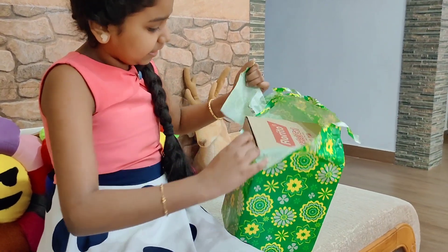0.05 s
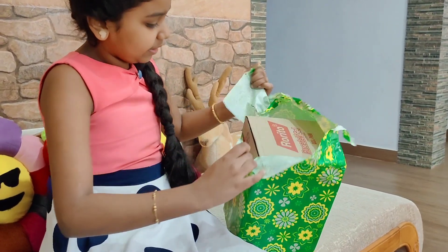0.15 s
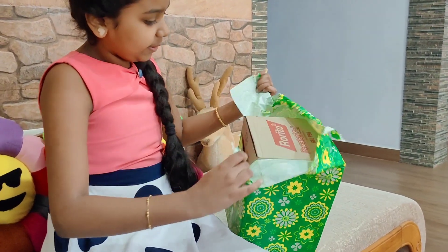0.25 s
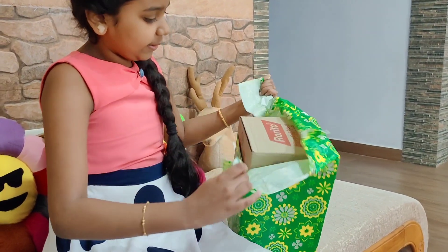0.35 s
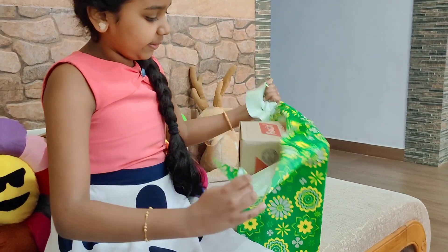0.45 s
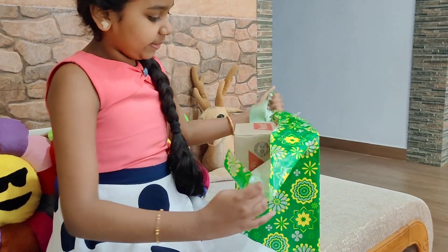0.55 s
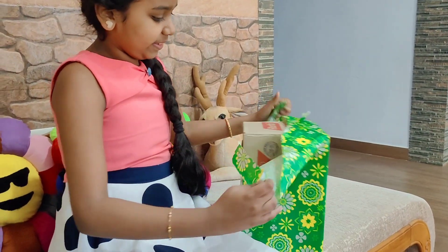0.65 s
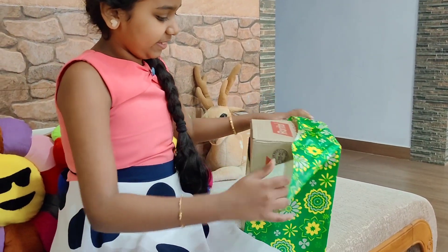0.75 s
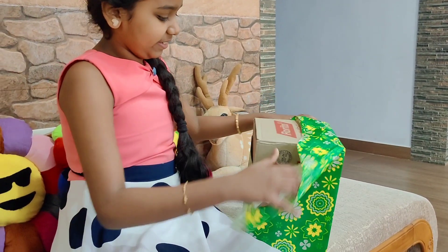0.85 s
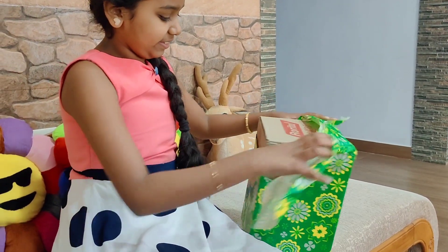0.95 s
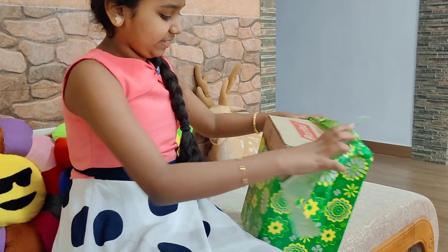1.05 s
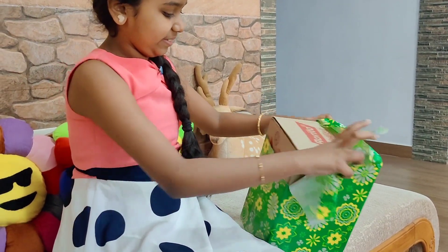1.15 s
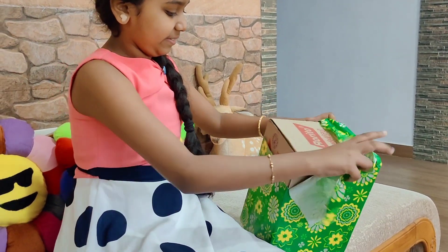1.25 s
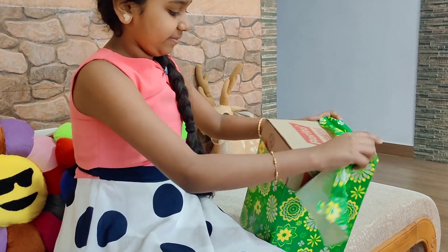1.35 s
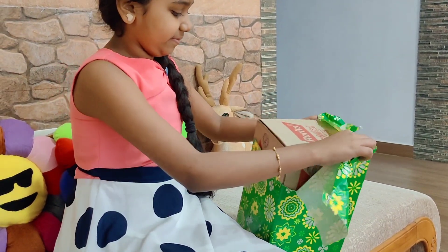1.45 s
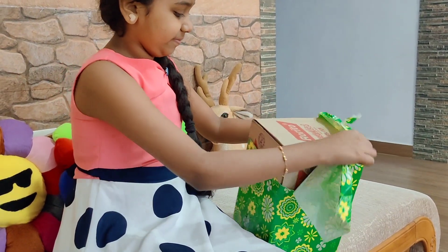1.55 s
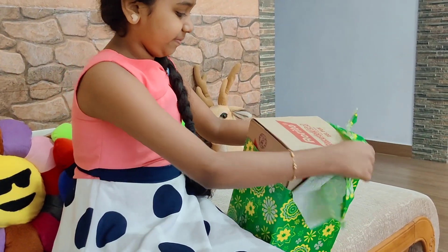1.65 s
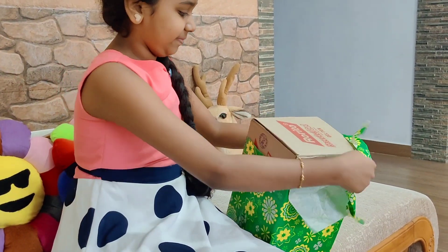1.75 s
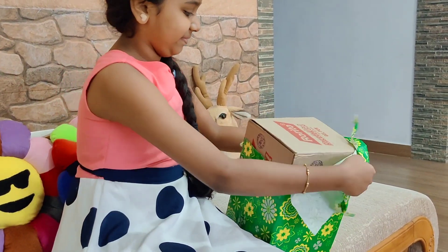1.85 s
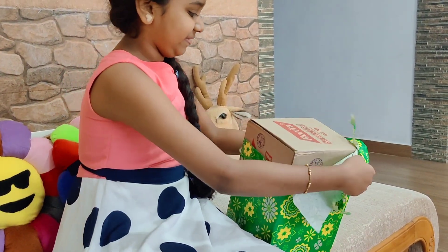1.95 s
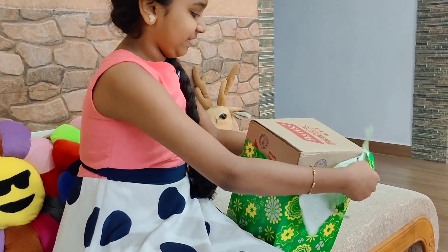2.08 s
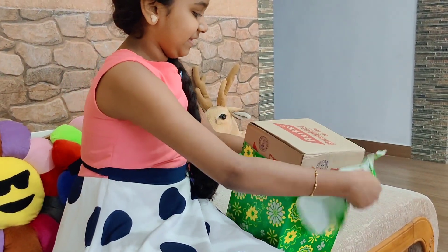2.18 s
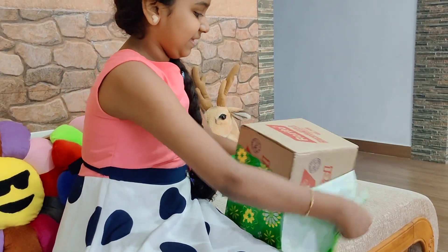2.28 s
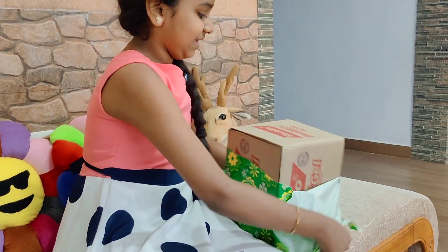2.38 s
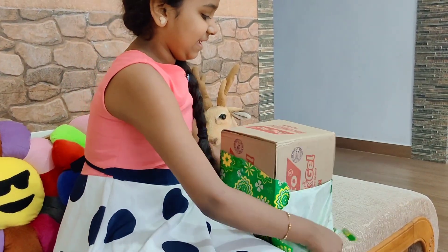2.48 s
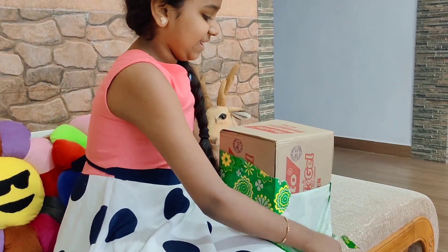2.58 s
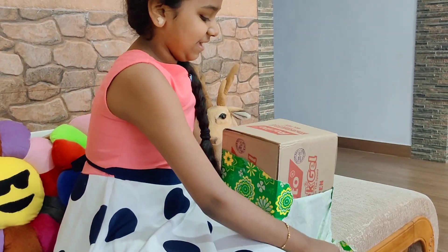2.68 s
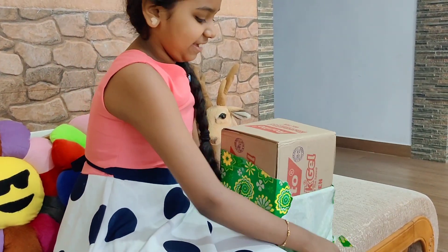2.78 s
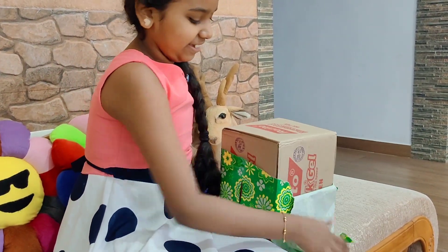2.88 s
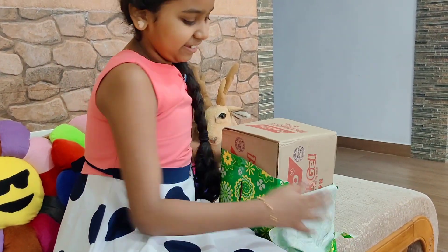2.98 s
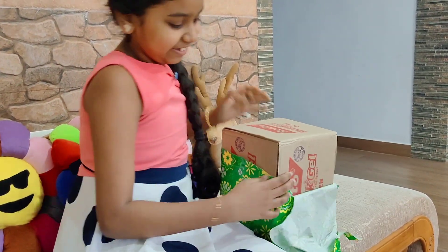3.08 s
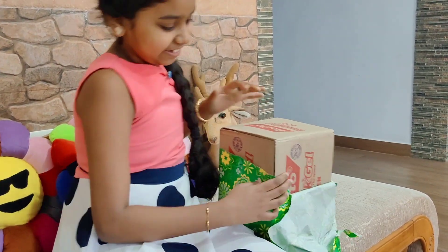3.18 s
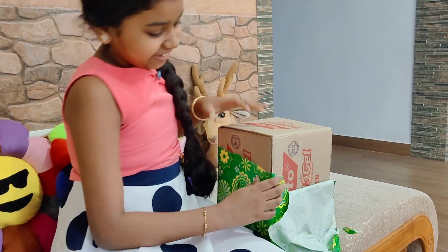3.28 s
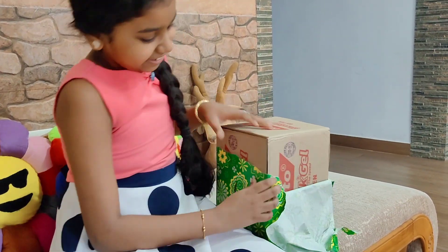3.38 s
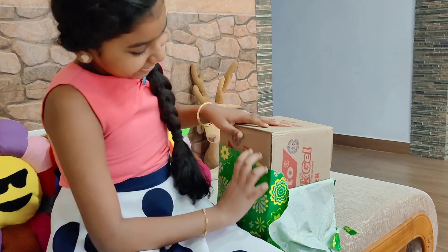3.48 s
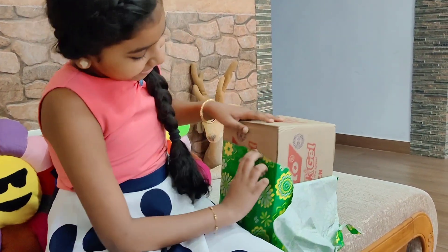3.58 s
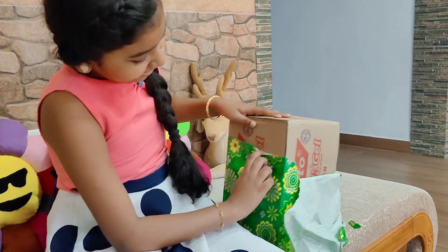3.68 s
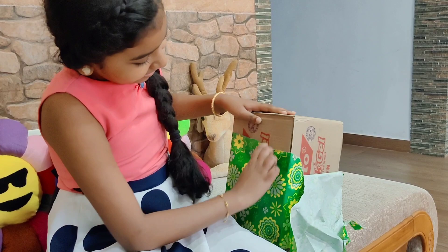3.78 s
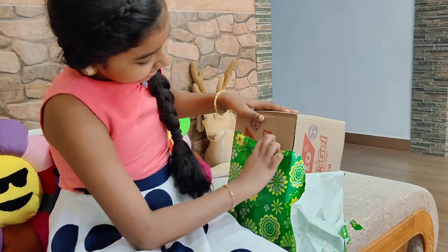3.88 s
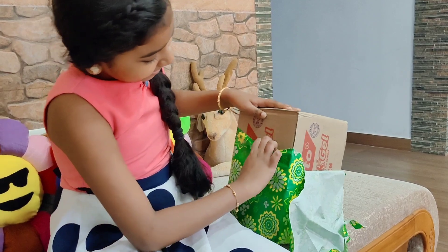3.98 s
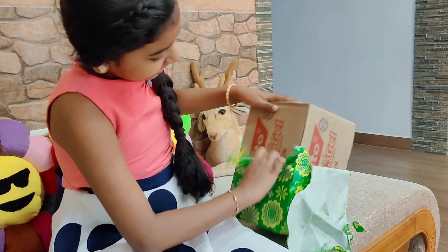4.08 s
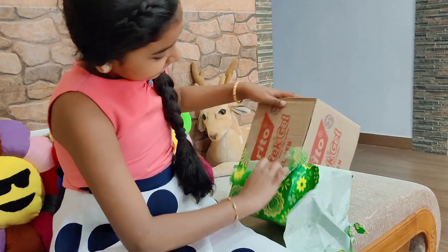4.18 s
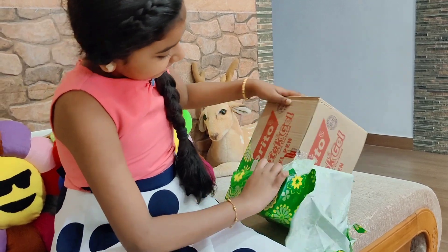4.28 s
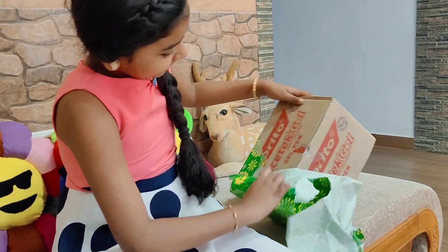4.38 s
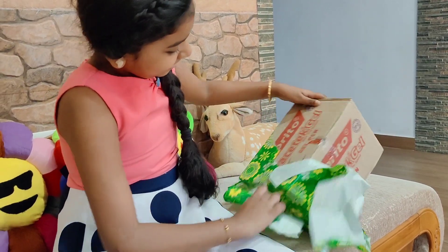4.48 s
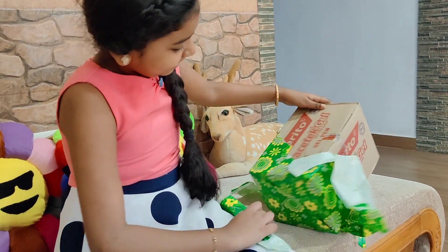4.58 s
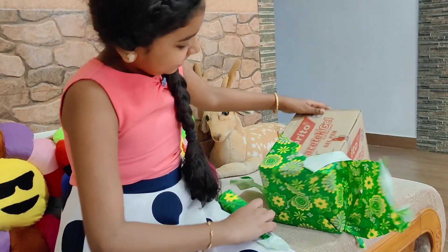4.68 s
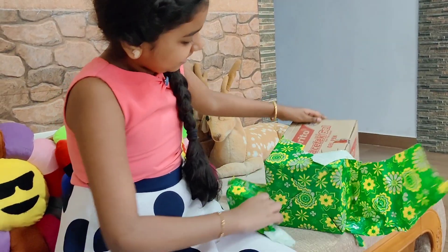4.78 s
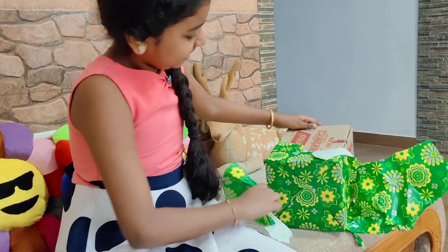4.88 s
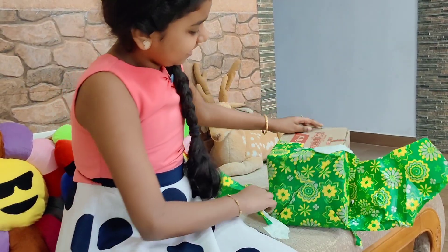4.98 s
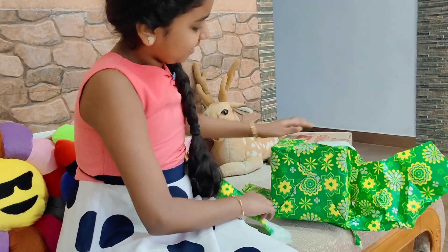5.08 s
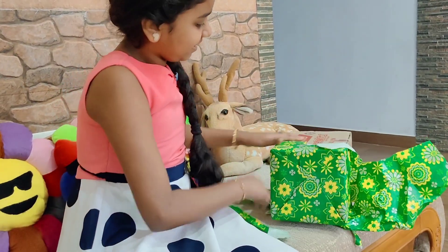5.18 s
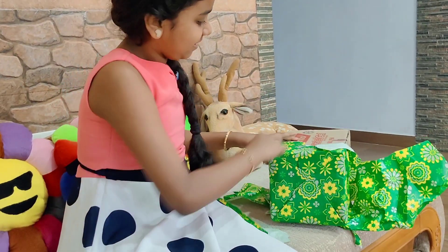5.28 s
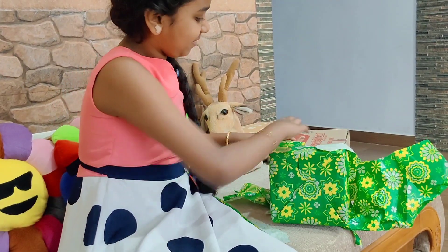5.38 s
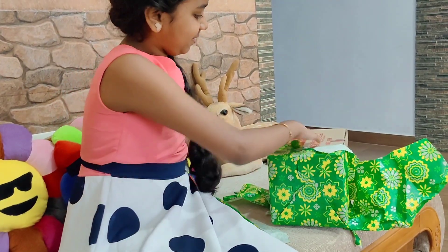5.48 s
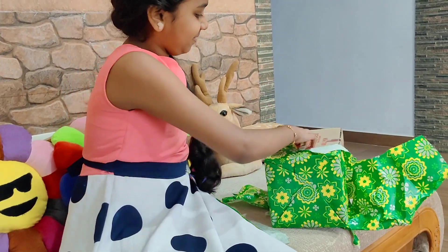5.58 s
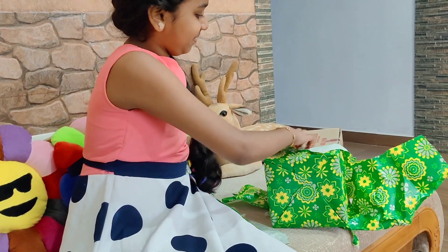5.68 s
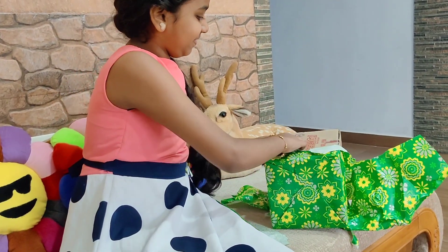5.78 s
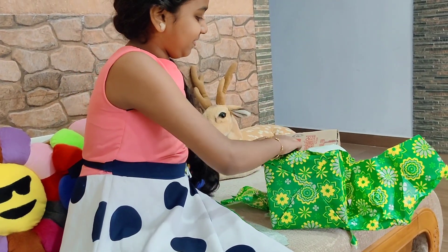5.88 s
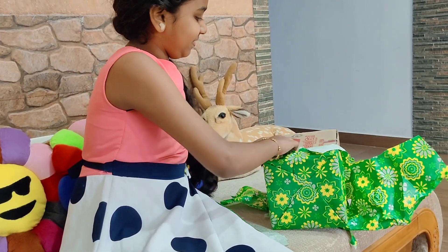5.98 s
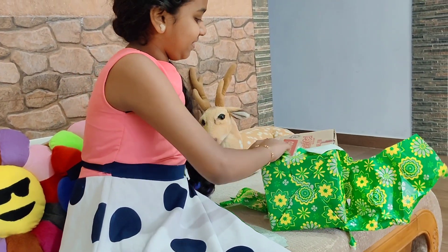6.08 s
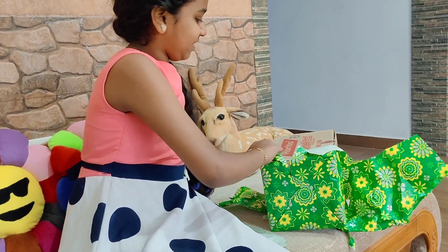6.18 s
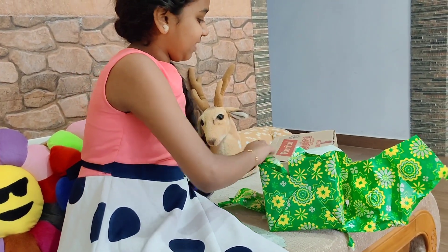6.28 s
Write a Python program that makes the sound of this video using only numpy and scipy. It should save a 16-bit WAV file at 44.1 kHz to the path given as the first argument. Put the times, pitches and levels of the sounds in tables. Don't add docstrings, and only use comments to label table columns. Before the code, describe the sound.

Thin glossy wrapping paper comes off a cardboard box in a hard, tiled room, heard by a bright phone about two metres away, over faint hiss and a distant low drone. Dense rustling starts at once; at about 0.28 s tape lets go in a very sharp, overloaded volley of cracks. Crinkling with crisp snaps goes on until 0.65, eases, then resumes near 0.97 with scattered clicks and pops through 2.0. From 2.1 paper is dragged down, strongest around 2.4 to 2.6, with soft hollow box thuds. From 3.0 to 3.65 it is nearly quiet: a metal bangle tinkles very faintly amid tiny ticks. Gripping crackles return at 3.7, swelling into a hard tug at 4.15 to 4.35 and another burst at 4.45 to 4.65. It fades to a lull around 5.1 to 5.6, then light picking, ticks and muffled taps grow until the end at about 6.3.

```python
import sys
import numpy as np
from scipy import signal
from scipy.fft import rfft, irfft
from scipy.io import wavfile
from scipy.ndimage import uniform_filter1d

SR = 44100
rng = np.random.default_rng(int(sys.argv[2]) if len(sys.argv) > 2 else 0)


def volts(x):
    e = np.asarray(x, float) / 20
    return 10 ** e


def pcm_store(signal):
    levels = np.round(np.clip(np.atleast_2d(signal), -1, 1) * 32767)
    wavfile.write(sys.argv[1], SR, levels.astype(np.int16).T)


N = 279594

# frequency in Hz, density in dB per Hz.
PAPER = [(65, -58), (110, -17), (221, -18.5), (279, -13.5), (399, -13), (707, -20), (1030, -15.5),
         (1520, -17.5), (2520, -18.5), (4870, -9.5), (6370, -2), (7490, 0), (7900, -18), (10300, -11),
         (17400, -120)]
# start in seconds, peak in dB, broad part in dB, left minus right in dB.
SNAPS = [(0.4285, -15.5, -28, -5), (0.5190, -19, -21, -16), (0.762, -28.5, -29, -10),
         (0.9734, -16.5, -24, -3), (1.0336, -19, -19, -5), (1.099, -15, -22, 0), (1.2452, -22.5, -4.5, -8),
         (1.4498, -23.5, -8, -9), (1.512, -12.5, -37, -2), (1.721, -21.5, -31, -6), (2.0425, -20, -9.5, -9),
         (2.394, -16.5, -6.5, -12.5), (2.4659, -13.5, -4.5, 1.5), (2.4946, -9.5, -16.5, -15),
         (2.628, -19.5, -10, 0), (2.723, -25.5, -32, 11), (3.7155, -27.5, -6.5, -1),
         (3.8076, -22.5, -34, -1.5), (3.9057, -20.5, -40, 4), (3.981, -22.5, -14.5, -12.5),
         (4.0704, -19.5, -31, -5), (4.0912, -17.5, -33.5, -7), (4.1204, -17.5, -30, -11),
         (4.1521, -11.5, -12.5, -9), (4.1695, -7, -10, 0.5), (4.208, -13.5, -35.5, -8.5),
         (4.4169, -17.5, -20, -1.5), (4.4477, -12, -29, -6), (4.5437, -11.5, -18, 9),
         (5.6999, -22, -19, -5)]
# start in seconds, peak in dB, broad part in dB,
# left minus right in dB.
MORE_SNAPS = [(0.4864, -19.5, -22, 3), (0.733, -31.5, -37, -10), (0.786, -34, -14, 12), (0.883, -35, -4.5, -2),
              (1.338, -28.5, -27, -6), (1.493, -28, -21, -7), (1.598, -23.5, -23, -7.5),
              (1.845, -32.5, -21, -16.5), (2.156, -30.5, -33.5, -32.5), (2.335, -24.5, -38, -4),
              (2.9502, -27.5, -7, -3), (3.181, -44, -19, 3), (3.2273, -38, -2.5, -5), (3.4262, -37, -18, 3),
              (3.517, -39.5, -22, -9), (3.5442, -38, -19, -7), (3.76, -23, -14, -8.5), (4.362, -20.5, -21, -2.5),
              (4.8096, -38, -26, 12), (4.869, -38, -9, -17), (5.075, -41, -19, 6), (5.6273, -39.5, -10, 0),
              (5.787, -27, -10, -5), (5.906, -27.5, -12, -3), (5.97, -21, -11.5, -7), (6.0214, -25, -14, 4),
              (6.1124, -22, -11, -7), (6.164, -20, -8, -4), (6.2316, -23.5, -31, -9), (6.318, -20.5, -30, -4.5)]
# start in seconds, peak in dB, pitch in Hz, T60 in seconds.
KNOCKS = [(0.274, -37.5, 395, 0.033), (0.518, -48.5, 267, 0.23), (0.738, -54.5, 428, 0.072),
          (0.858, -55.5, 295, 0.036), (0.971, -65, 293, 0.064), (1.18, -48, 406, 0.044),
          (2.138, -55, 318, 0.073), (2.299, -40.5, 544, 0.018), (2.393, -47.5, 403.5, 0.14),
          (2.761, -46, 345.3, 0.09), (2.966, -58, 276, 0.25), (3.213, -63.5, 185.8, 0.22),
          (3.289, -63, 357, 0.073), (3.46, -51.5, 190, 0.15), (3.62, -58.5, 366, 0.078),
          (3.658, -51.5, 361, 0.045), (3.729, -44.5, 355, 0.087), (3.759, -45, 294.6, 0.088),
          (3.778, -45.5, 383, 0.09), (3.799, -64, 363, 0.031), (3.902, -53, 270, 0.044),
          (3.948, -48.5, 342.4, 0.12), (3.982, -50, 393, 0.14), (4.119, -48, 382, 0.21),
          (4.166, -41.5, 347, 0.066), (4.218, -52, 413, 0.16), (5.628, -48.5, 342, 0.078),
          (5.785, -50.5, 285.3, 0.19), (6.027, -51, 360, 0.073), (6.198, -47.5, 181, 0.13)]
LEFT_LAG = 50


def level(x, db):
    return x * volts(db) / np.sqrt(np.mean(x ** 2))


def colour(x, points):
    hz, db = np.transpose(points)
    grid = np.maximum(np.fft.rfftfreq(4096, 1 / SR), 1)
    gain_db = np.interp(np.log(grid), np.log(hz), np.maximum(db, -60))
    ceps = irfft(np.log(volts(gain_db)))
    ceps[1:2048] *= 2
    ceps[2049:] = 0
    taps = irfft(np.exp(rfft(ceps)))
    return signal.oaconvolve(np.atleast_2d(x), taps[None], axes=1)[:, :N]


def band(x, index):
    edges_hz = [110, 650, 2000, 4500, 8100]
    sos = signal.butter(2, edges_hz[index:index + 2], "bandpass", fs=SR, output="sos")
    return signal.sosfilt(sos, x)


def impulses(s, size):
    return np.bincount(np.clip((s * SR).astype(int), 0, N - 1), size, N)


def dying(s, db, time_s):
    return signal.lfilter([1], [1, -np.exp(-2 / (time_s * SR))], impulses(s, volts(db) ** 2))


def sides(pan_db):
    return volts(np.array([pan_db, -pan_db]) / 2)


def buckle(spikes, flutter_s, flutter_db, lag):
    shared = 0.35
    left, right = np.atleast_2d(spikes)[0], np.atleast_2d(spikes)[-1]
    direct = np.array([np.roll(left, lag), right])
    power = signal.lfilter([1], [1, -np.exp(-2 / (flutter_s * SR))], direct ** 2)
    both, *own = rng.standard_normal((3, N))
    shake = np.sqrt(shared) * np.array([np.roll(both, lag), both]) + np.sqrt(1 - shared) * np.array(own)
    return colour(direct + volts(flutter_db) * np.sqrt(power) * shake, PAPER)


def air():
    # frequency in Hz, density in dB per Hz.
    hiss_curve = [(40, -22), (65, -13), (100, -7.5), (250, -13.5), (700, -23.5), (1700, -25.5),
                  (3000, -20.5), (5000, -16.5), (6700, -9), (7500, -8), (8000, -30.5)]
    patch_db, patch_s = 1.6, 0.05
    mid, side = colour(rng.standard_normal((2, N)), hiss_curve)
    side = signal.sosfilt(signal.butter(1, 500, "highpass", fs=SR, output="sos"), side)
    even = np.array([mid + side, mid - side])
    size = int(patch_s * SR)
    drift = uniform_filter1d(uniform_filter1d(rng.standard_normal((4, N)), size=size), size=size)
    patches = sum(band(even, index) * (volts(level(d, 0) * patch_db) - 1) for index, d in enumerate(drift))
    return level(even + patches, -62)


def hum():
    # time in seconds, level in dB.
    drone_curve = [(0.0, -62.5), (1.16, -70.5), (1.59, -64.5), (1.87, -73), (2.21, -58.5), (2.4, -64.5),
                   (3.85, -65.5), (4.22, -63.5), (5.08, -64.5), (5.95, -65.5), (6.34, -63.5)]
    pitch_hz, width_hz = 45, 16
    t = np.arange(N) / SR
    edges = [pitch_hz - width_hz / 2, pitch_hz + width_hz / 2]
    sos = signal.butter(1, edges, "bandpass", fs=SR, output="sos")
    rumble = signal.sosfilt(sos, rng.standard_normal(N))
    drone = level(rumble, 2.5) + np.sin(2 * np.pi * pitch_hz * t)
    return level(drone, 0) * volts(np.interp(t, *np.transpose(drone_curve)))


def hand():
    # time in seconds, effort in dB, fold size in dB above the usual.
    lift_flap = [(0, -32, -4.5), (.21, -38.5, 1), (.3, -42.5, 2), (.391, -34.5, 0), (.533, -31, 1),
                 (.601, -29, -0.5), (.66, -42, 0.5), (.962, -53, 1)]
    # time in seconds, effort in dB, fold size in dB.
    peel_side = [(0.974, -30, -1.5), (1.09, -43, 1.5), (1.124, -39, 0.5), (1.4, -41.5, 1.5),
                 (1.5, -40, 0.5), (1.56, -38.5, 1), (1.764, -36.5, 3), (2.02, -45.5, 3)]
    # time in seconds, effort in dB, fold size in dB.
    drag_down = [(2.05, -41.5, 0.5), (2.168, -33, 1), (2.266, -39.5, 1.5), (2.391, -34.5, 6.5),
                 (2.49, -25.5, -0.5), (2.642, -34.5, 1), (2.756, -32.5, 0.5), (2.925, -46.5, 1),
                 (2.978, -40, -0.5)]
    # time in seconds, effort in dB, fold size in dB.
    rest = [(3.05, -55.5, 3.5), (3.11, -65.5, 6), (3.2, -78, 2), (3.27, -70.5, 6.5), (3.35, -67, -4),
            (3.41, -61, -6), (3.48, -60.5, -0.5), (3.58, -63, 1.5), (3.64, -67, -2)]
    # time in seconds, effort in dB, fold size in dB.
    grip_again = [(3.7, -56, -1), (3.73, -50, 4), (3.804, -44.5, -2), (3.864, -54.5, -6), (3.97, -50, -0.5),
                  (4.0, -47, 1), (4.048, -42.5, -2.5), (4.16, -39, -1)]
    # time in seconds, effort in dB, fold size in dB.
    tug_off = [(4.18, -30, -2), (4.21, -22, -4.5), (4.3, -25, -5.5), (4.4, -46.5, 1), (4.494, -26, 0),
               (4.554, -25.5, -2), (4.656, -43.5, 1.5), (4.836, -51, 1.5), (4.912, -51.5, 6.5)]
    # time in seconds, effort in dB, fold size in dB.
    let_go = [(5.0, -50.5, 2.5), (5.09, -57.5, 3.5), (5.145, -69.5, 9.5), (5.2, -66, 8), (5.25, -70, 5),
              (5.33, -59, -1.5), (5.46, -80, 3), (5.51, -71, 14.5), (5.555, -73.5, 15.5)]
    # time in seconds, effort in dB, fold size in dB.
    pick_at_lid = [(5.6, -71.5, 12.5), (5.64, -60.5, 9), (5.71, -45, -1), (5.834, -49.5, 7.5),
                   (5.96, -49.5, 2), (5.98, -38.5, 1), (6.1, -45, -1), (6.2, -34.5, -2.5),
                   (6.34, -49.5, 0.5)]
    # weight at the start in dB, weight at the end in dB, left minus right in dB.
    hand_weights = [
        (6, 0.5, -3),
        (-1.5, 1.5, -0.9),
        (-2, 7, -2),
        (-10, 0, -0.5),
        (-1, 10.5, -3.5),
        (-2, 3.5, -2.5),
        (5.5, 2, -1.5),
        (10, 1.5, -2.5),
    ]
    moves = [lift_flap, peel_side, drag_down, rest, grip_again, tug_off, let_go, pick_at_lid]
    rows = []
    for move, (first_db, last_db, pan_db) in zip(moves, hand_weights):
        for point, weight_db in zip(move, np.linspace(first_db, last_db, len(move))):
            rows.append((*point, weight_db, pan_db))
    s, *columns = np.transpose(rows)
    effort_db, fold_db, weight_db, pan_db = (np.interp(np.arange(N) / SR, s, c) for c in columns)
    snap_s, snap_db = np.transpose(SNAPS + MORE_SNAPS)[:2]
    after = dying(snap_s, snap_db - 18, 0.027)
    return 10 * np.log10(volts(effort_db) ** 2 + after), fold_db, weight_db, pan_db


def rustle(fine_db, fold_db, weight_db, pan_db):
    # level in dB at the usual effort,
    # dB per dB of effort, dB per dB of fold size.
    sheet_law = (-61.5, 1, 1.86)
    # level in dB, dB per dB of effort, dB per dB of fold size.
    broad_law = (-46.5, 0.97, 0.76)
    # level in dB, dB per dB of effort, dB per dB of fold size.
    box_law = (-67, 0.85, 1)
    creases_per_s, spread_db, cap_db = 2200, 4.5, 8
    scatter, usual_db = 1.9, -40
    sheet_db, broad_db, box_db = (db + per_effort * (fine_db - usual_db) + per_fold * fold_db
                                  for db, per_effort, per_fold in (sheet_law, broad_law, box_law))
    count = int(creases_per_s * N / SR)
    when, sign = rng.random((2, count))
    size_db = np.minimum(spread_db * rng.exponential(size=count), cap_db)
    place = scatter * rng.standard_normal(count) / SR
    out = 0
    for index, db in enumerate([sheet_db, broad_db, fine_db], 1):
        own_db = 2.2 * rng.standard_normal(count)
        size = np.sign(sign - 0.5) * volts(size_db + own_db)
        spikes = [impulses(when * N / SR + late, size) for late in (place, 0)]
        lag = LEFT_LAG * (index > 1)
        swarm = level(band(buckle(spikes, 0.002, -9, lag), index), 0)
        out = out + swarm * volts(db + 0.5) * sides(pan_db)
    noise = rng.standard_normal(N) + 0.27 * rng.standard_normal((2, N))
    rumble = level(band(colour(noise, PAPER), 0), 0)
    knock_s, knock_db = np.transpose(KNOCKS)[:2]
    scrape = dying(knock_s, knock_db - 11, 0.07)
    return out + rumble * np.sqrt(volts(box_db + weight_db) ** 2 + scrape)


def pops():
    # start in seconds, peak in dB, pitch in Hz, left minus right in dB.
    small_panels = [(0.0445, -26, 6360, 0), (0.5280, -16, 6100, -2), (0.5932, -20, 4600, -3),
                    (0.9770, -19, 6000, 3), (1.1493, -31, 7200, 0.5), (1.1966, -29.5, 6650, 5.5),
                    (1.222, -30.5, 5620, 9), (1.2626, -33, 6450, 8), (1.399, -27.5, 6400, -4),
                    (1.4446, -31, 7440, 8), (1.5337, -24, 6130, 4), (1.6514, -39, 6200, -1),
                    (1.9674, -35.5, 7130, 6), (2.233, -20.5, 6920, 3), (2.299, -31.5, 7350, 8),
                    (2.4317, -19, 4800, 3), (2.441, -18, 6640, -7), (2.5146, -19.5, 6220, 0),
                    (2.554, -29.5, 6600, 1.5), (2.5825, -33, 7500, 6), (2.6231, -27.5, 6440, -0.5),
                    (2.6464, -25, 6560, -2.5), (2.6908, -23.5, 7000, 11.5), (2.772, -27, 7310, 2),
                    (2.9988, -40, 6440, 14), (3.5864, -44, 6650, -4), (3.926, -45.5, 6880, -0.5),
                    (3.9635, -27, 7320, 0), (4.083, -23.5, 7420, 12.5), (4.142, -13, 6100, 3),
                    (4.7122, -40, 6450, 2), (4.789, -40, 6680, 8.5), (4.8852, -38, 7480, -1),
                    (5.1731, -48, 6400, 0), (5.4054, -45, 6890, 0), (5.499, -40, 7030, 0.5),
                    (5.569, -39, 7460, 2.5), (5.6935, -33.5, 6850, 6), (5.8085, -32.5, 6800, 10.5),
                    (5.9387, -41, 6400, -1.5), (6.0844, -38, 7280, -4), (6.137, -26.5, 6810, 6),
                    (6.203, -30, 7370, -5.5), (6.2544, -31, 6000, 7)]
    # start in seconds, peak in dB, pitch in Hz, left minus right in dB.
    large_panels = [(0.2694, -16, 3900, 8), (0.3661, -37, 3670, 2), (0.408, -35.5, 3330, 11),
                    (0.631, -35, 3800, 8), (0.7657, -47, 4200, -2.0), (0.776, -40, 4070, 3),
                    (1.261, -29, 4300, -3), (1.268, -27, 4400, 3), (2.0998, -30.5, 2770, -1),
                    (2.298, -36.5, 4480, 4.5), (2.4415, -16, 3130, -5), (2.622, -27, 3690, -1),
                    (3.2943, -52, 4160, 5.0), (3.4243, -40.5, 3250, -6), (3.5448, -55, 3270, 3),
                    (3.6072, -50, 2250, -3), (3.6244, -54, 2300, 3.5), (3.6646, -48, 2400, -4),
                    (3.7534, -44.5, 4410, 4), (3.8063, -30.5, 4460, 2), (3.888, -34, 4500, -3),
                    (3.967, -37.5, 3830, -0.5), (3.9835, -38, 3670, -4), (3.999, -41, 3980, 4.5),
                    (4.05, -34, 4370, 2), (4.1688, -13, 4440, -4), (4.5878, -26, 3970, 6),
                    (4.6158, -34.5, 4400, 4), (5.253, -56, 3770, -1), (5.905, -36.5, 4400, -2),
                    (5.9394, -41.5, 3800, 8), (6.0222, -34, 4260, 8.5), (6.319, -26.5, 3980, -3)]
    # start in seconds, peak in dB, pitch in Hz, left minus
    # right in dB.
    more_small_panels = [(0.087, -25.5, 6170, 4.5), (0.9038, -34.5, 6220, 0.5), (1.253, -32, 6660, 2.5),
                         (1.6998, -36.5, 6680, -0.5), (1.8447, -34, 6400, -2), (1.8971, -35.5, 6130, 2),
                         (1.9864, -29.5, 7450, -7), (3.8075, -22, 7300, -10), (3.8274, -40.5, 6350, 2),
                         (3.9968, -23.5, 7400, 2), (4.0908, -22, 7400, 1), (4.152, -10, 6130, -4.5),
                         (4.725, -35, 7360, 9.5), (4.8653, -38, 7400, -2), (4.9511, -48, 6860, -2),
                         (5.0834, -47, 6790, -5), (5.252, -55, 7330, -4), (5.466, -53, 6390, 1),
                         (5.5633, -47.5, 6800, -11), (6.073, -37, 6260, -3)]
    half_width_octaves, shiver_s, shiver_db = 0.31, 0.0023, -7
    out, t = np.zeros((2, N + 2000)), np.arange(1000) / SR
    for s, db, hz, pan_db in small_panels + large_panels + more_small_panels:
        shiver = volts(shiver_db) * np.exp(-t / shiver_s) * rng.standard_normal((2, len(t)))
        edges = hz * 2.0 ** (half_width_octaves * np.array([-1, 1]))
        sos = signal.butter(2, edges, "bandpass", fs=SR, output="sos")
        pop = signal.sosfilt(sos, shiver + (t == 0))
        for row, gain, lag, wave in zip(out, sides(pan_db), (LEFT_LAG // 2, -LEFT_LAG // 2), pop):
            row[int(s * SR) + lag:][:len(t)] += volts(db - 1) * gain * wave / np.abs(wave).max()
    return out[:, :N]


def snaps(table, flutter_s, flutter_db, low_db, lag):
    s, peak_db, broad_db, pan_db = np.transpose(table)
    unit = colour(impulses(np.zeros(1), np.ones(1)), PAPER)
    out = np.zeros((2, N))
    for index, db in enumerate([broad_db + low_db, broad_db, 0 * s], 1):
        spikes = [impulses(s - lag / SR / 2, volts(peak_db + db - 2) * gain) for gain in sides(pan_db)]
        burst = band(buckle(spikes, flutter_s, flutter_db, lag * (index > 1)), index)
        out += burst / np.abs(band(unit, index)).max()
    return out


def tape_rip():
    # start in seconds, peak in dB, broad part in dB, left minus right in dB.
    releases = [(.192, -23, -11.5, -8), (.215, -19, -12, 3.5), (.2698, -11.5, 0, 2.5),
                (.2722, -9.5, -8, 1.5), (.2752, 1.5, -7, 5), (.2774, -4.5, -8, 6), (.2805, -9, -16, 3),
                (.2816, 1, -8, 6), (.2830, 0, -9, 3), (.2838, -1.5, -9, 2), (.2855, -12, -15.5, 2.5),
                (.2883, .5, -14, 3), (.2911, -8, -10, 5.5), (.2963, -9, -20, 6), (.3003, -10, -12.5, 7.5),
                (.3062, -12, -13, -2.5), (.3185, -19, -18, -3)]
    # frequency in Hz, gain in dB.
    tape_tint = [(2000, 3.5), (3000, 1.5), (4400, 11), (6200, 0), (7500, 4)]
    return colour(snaps(releases, 0.001, -19, -23.5, lag=2), tape_tint)


def ring(s, hz, db, t60, push_s):
    out, start = np.zeros(N), int(s * SR) + 1
    t = np.arange(start, min(N, start + int(t60 * SR))) / SR
    since = t - s
    envelope = volts(db - 60 * since / t60) * (1 - np.exp(-since / push_s))
    out[start:start + len(t)] = envelope * np.sin(2 * np.pi * hz * t)
    return out


def thuds():
    # start in seconds, peak in dB, pitch in Hz, T60 in seconds.
    shifts = [(0.271, -55, 156, 0.12), (1.173, -53, 86.1, 0.12), (1.285, -58.5, 175, 0.1),
              (2.299, -54, 167, 0.1), (2.388, -48, 188, 0.15), (2.47, -51, 194, 0.13),
              (2.749, -47, 127, 0.12), (3.22, -62, 180, 0.14), (3.464, -57, 186, 0.088),
              (3.652, -50, 94.2, 0.1), (3.733, -51, 183, 0.15), (3.898, -59, 194, 0.15),
              (4.163, -41, 183, 0.13), (4.242, -46, 161, 0.12), (5.964, -50.5, 196, 0.14),
              (6.195, -46, 183, 0.12)]
    return sum(ring(s, hz, db, t60, 0.0054) for s, db, hz, t60 in shifts)


def box():
    rattle = 2 + level(uniform_filter1d(rng.standard_normal(N), size=200), 0)
    out = 0
    for s, db, hz, t60 in KNOCKS:
        wall = ring(s, hz, db, t60, 0.0052)
        inside = ring(s, 410, db - 10.5, 0.5 * t60, 0.0027)
        seat = ring(s, 150, db - 11, 0.082, 0.0068)
        out = out + wall + inside + seat
    return rattle * out


def paper_snaps():
    # start in seconds, peak in dB, broad
    # part in dB, left minus right in dB.
    inner_folds = [(0.4333, -17.5, -20, -5), (0.4754, -19, -15, -5.5), (0.541, -24, -23, -4),
                   (0.5513, -16, -27, -5.5), (0.9826, -18.5, -19, 6), (1, -22.5, -20, 2),
                   (1.5157, -29, -4, -9), (1.613, -27, -12, -1), (2.102, -38.5, 2, -8),
                   (3.293, -46, -16, -1), (3.7273, -39.5, -2, -1), (3.784, -29.5, -23, -5.5),
                   (4.14, -23, -2, -7.5), (4.1844, -35, -28.5, 3), (4.2454, -24.5, -20.5, 7),
                   (4.283, -29, -23.5, 2), (4.313, -31, -27.5, -5), (4.4847, -13, -20, -8),
                   (4.5027, -18, -16, -10.5), (5.635, -40, -10, -9), (3.89, -33.5, -21, -2),
                   (4.0185, -21.5, -32, 3), (4.0498, -22, -27, 1.5), (5.4843, -46, -1, -11),
                   (5.724, -26.5, -46, 6), (5.764, -30, -36, -4), (5.8834, -32, -37, -6.5),
                   (5.991, -18.5, -35, 3.5), (6.072, -28.5, -30, 10.5), (2.134, -21.5, -2, -10),
                   (.701, -36, -14, 0), (0.768, -27, -15, -2), (1.253, -20, -14, 1.5),
                   (1.9, -22.5, -14, -1.5), (3.565, -41, -17, 0), (3.7898, -26.5, -11, -3),
                   (2.5016, -16, -17, -0.5), (3.753, -28, -12.5, -1), (.4365, -18, -21, 0),
                   (.555, -12.5, -7, 1), (4.477, -19.5, -12, -4)]
    return snaps(SNAPS + MORE_SNAPS + inner_folds, 0.002, -12, -12, lag=LEFT_LAG)


def bangle():
    # start in seconds, then the level of each of the three modes in dB.
    taps = [
        (2.98, -77, -68, -56),
        (3.14, -88, -77, -62),
        (3.37, -90, -76, -72),
        (3.425, -90, -67, -61),
        (3.60, -90, -74, -72),
        (3.635, -90, -78, -60),
    ]
    modes_hz = [1227, 3280, 6045]
    modes_t60 = [1.5, 1.3, 1.0]
    return sum(ring(s, hz, db, t60, 0.0022)
               for s, *dbs in taps for hz, db, t60 in zip(modes_hz, dbs, modes_t60))


def room(x):
    t60_s, tail_db = 0.33, -14.5
    t = np.arange(int(0.8 * SR)) / SR
    common, *own = rng.standard_normal((3, len(t)))
    low = signal.butter(2, 1100, fs=SR, output="sos")
    tail = own + signal.sosfilt(low, common - own)
    tail *= volts(-60 * t / t60_s) * np.clip(t / 0.019, 0, 1)
    tail *= volts(tail_db) / np.sqrt(np.sum(tail ** 2, axis=1, keepdims=True))
    return signal.fftconvolve(x, tail, axes=1)[:, :N]


def scene():
    near = rustle(*hand()) + pops() + tape_rip()
    near = near + thuds() + box() + paper_snaps() + bangle()
    return near + room(near) + air() + hum()


def low_pass(x):
    return signal.sosfilt(signal.butter(12, 8660, fs=SR, output="sos"), x)


def record(dry):
    # frequency in Hz, left minus right in dB.
    port_tilt = [(300, 1.5), (1000, 1.5), (2700, 5), (5000, 5.5), (6500, 8), (7600, -7.5)]
    ports = [colour(x, [(hz, sign * db / 2) for hz, db in port_tilt])[0] for x, sign in zip(dry, (1, -1))]
    top_hz = 7893
    cut = signal.sosfilt(signal.ellip(10, 0.3, 85, top_hz, fs=SR, output="sos"), ports)
    return low_pass(np.clip(cut, -1, 1))


dry = scene()
out = record(dry)
pcm_store(out)
```